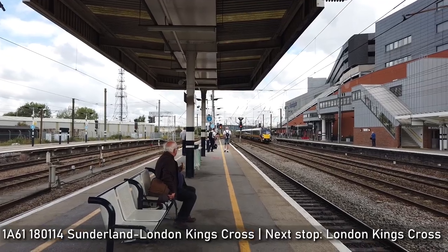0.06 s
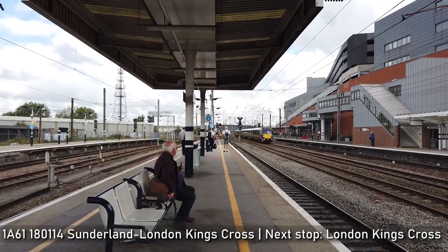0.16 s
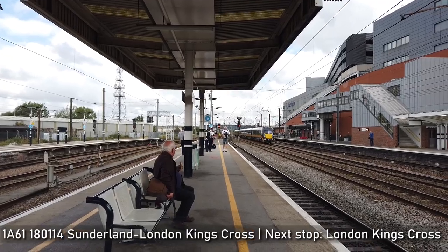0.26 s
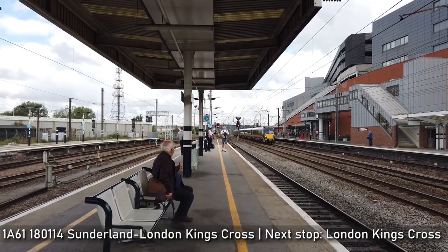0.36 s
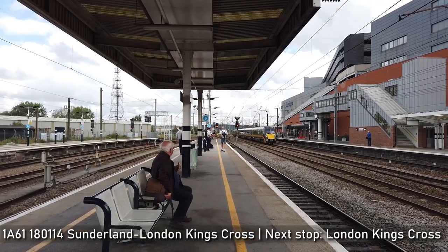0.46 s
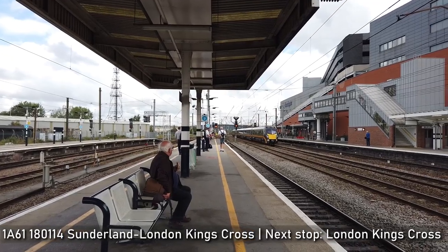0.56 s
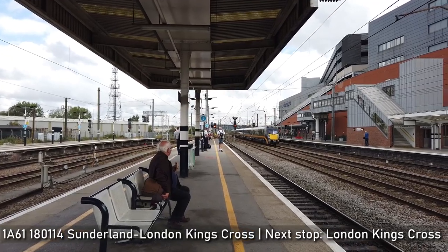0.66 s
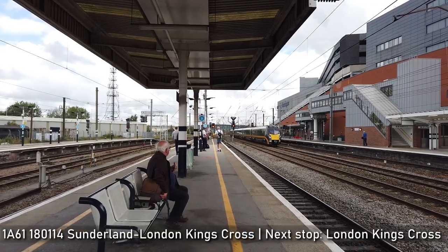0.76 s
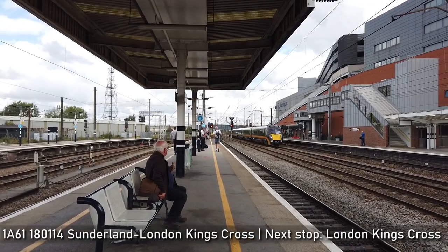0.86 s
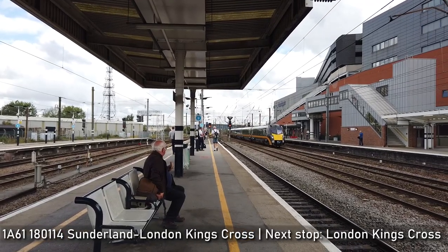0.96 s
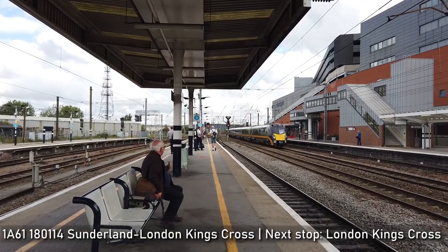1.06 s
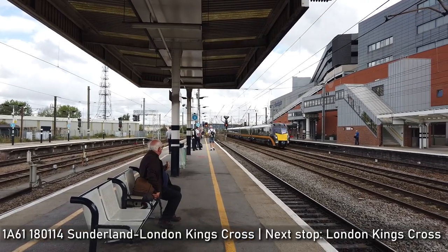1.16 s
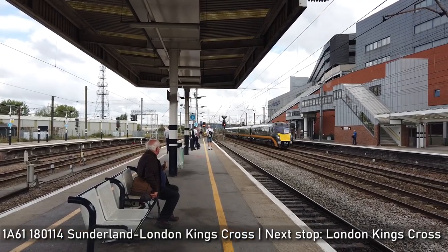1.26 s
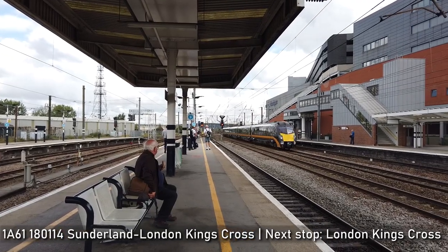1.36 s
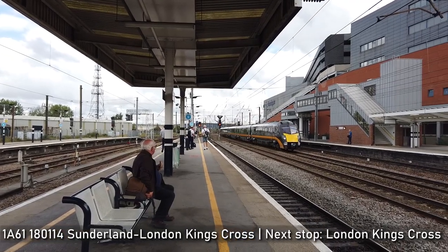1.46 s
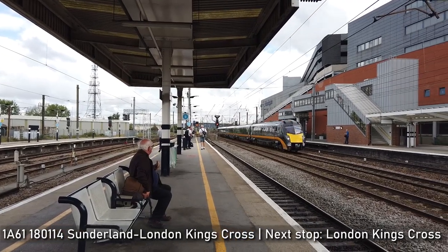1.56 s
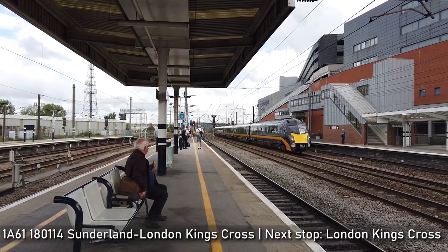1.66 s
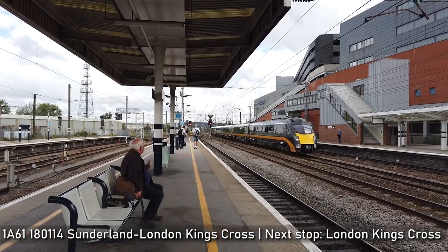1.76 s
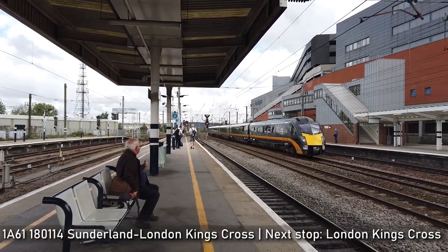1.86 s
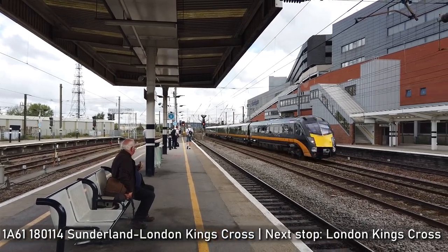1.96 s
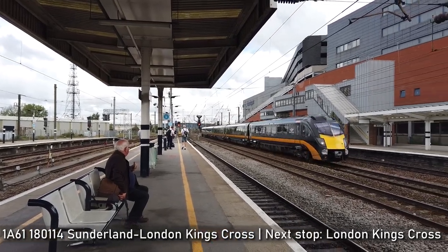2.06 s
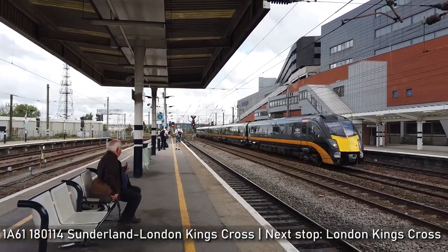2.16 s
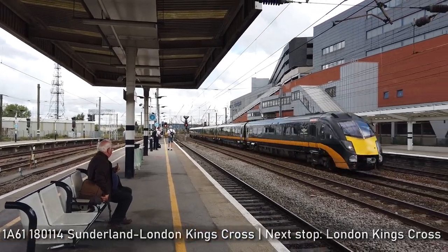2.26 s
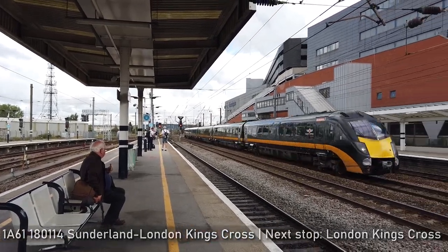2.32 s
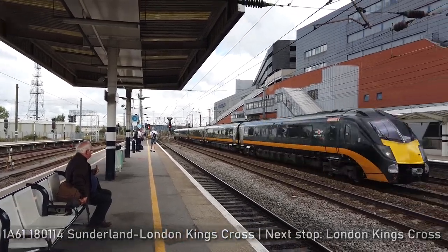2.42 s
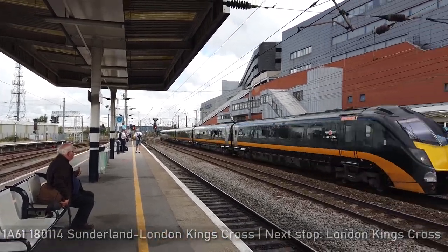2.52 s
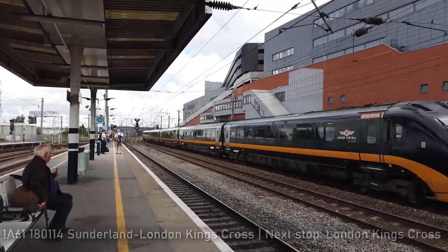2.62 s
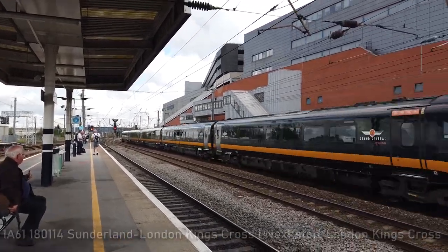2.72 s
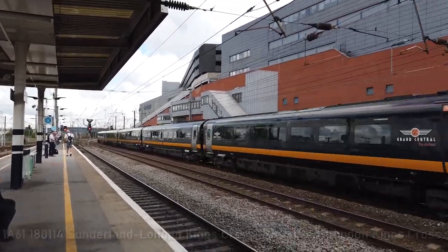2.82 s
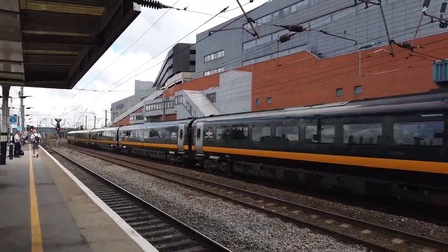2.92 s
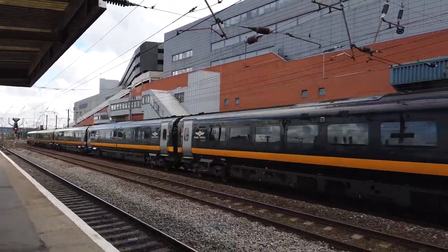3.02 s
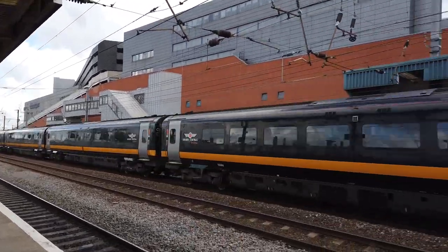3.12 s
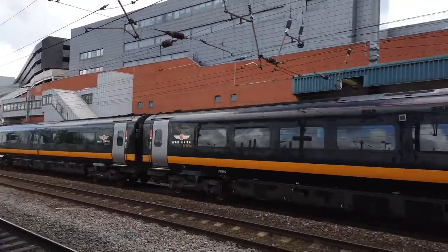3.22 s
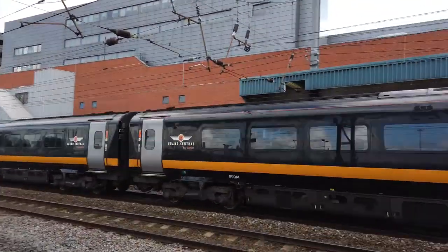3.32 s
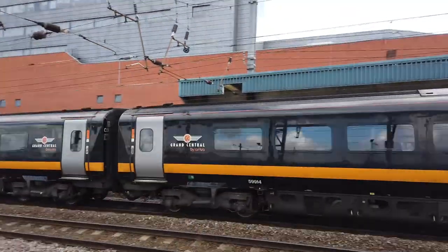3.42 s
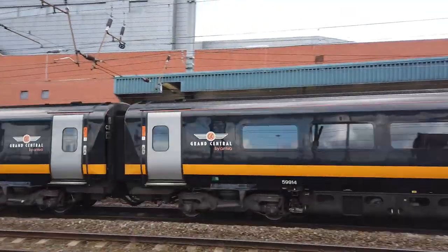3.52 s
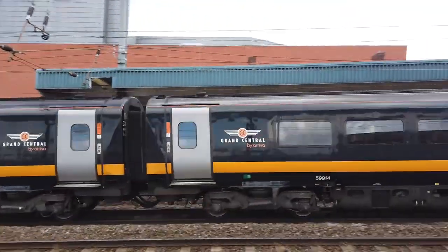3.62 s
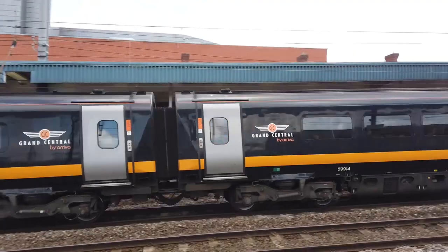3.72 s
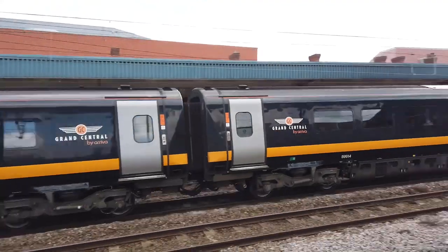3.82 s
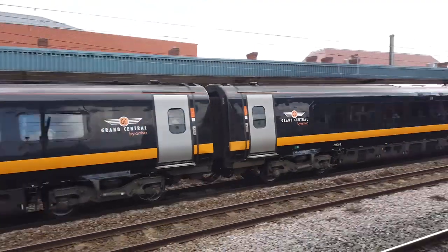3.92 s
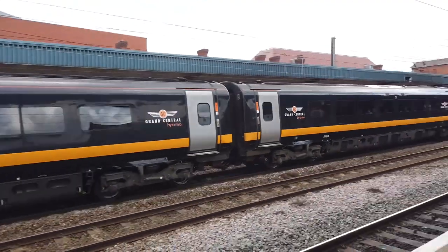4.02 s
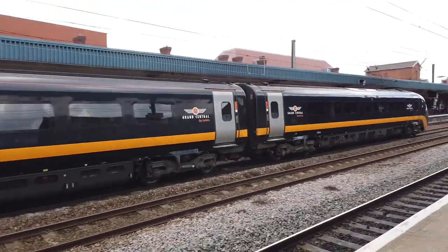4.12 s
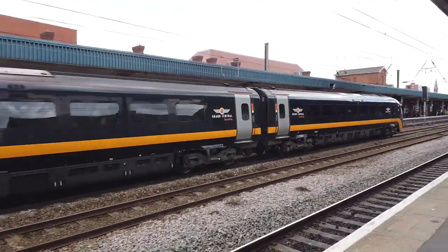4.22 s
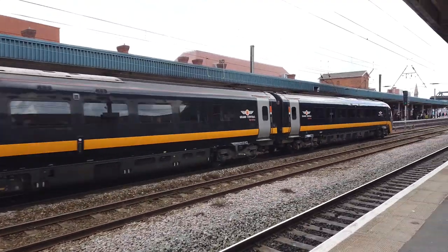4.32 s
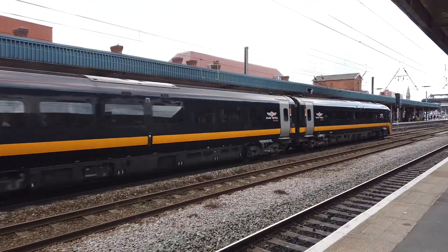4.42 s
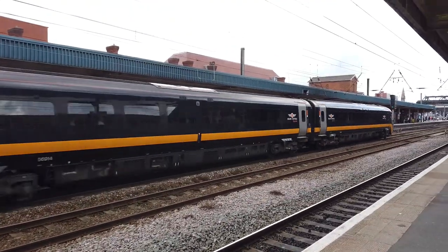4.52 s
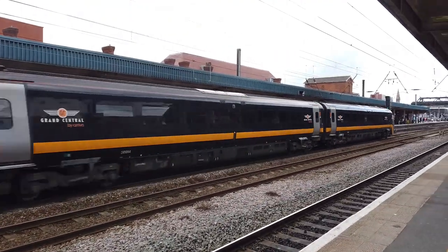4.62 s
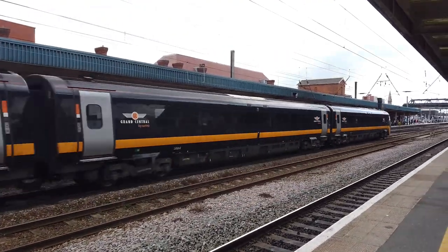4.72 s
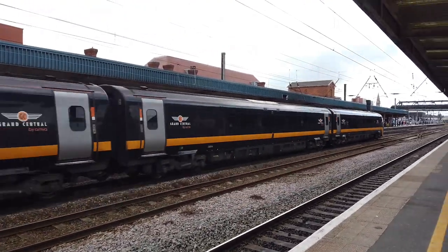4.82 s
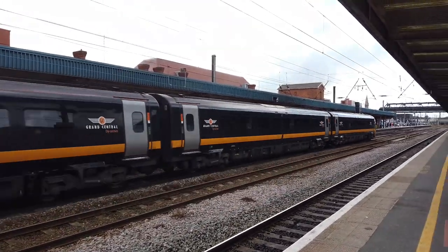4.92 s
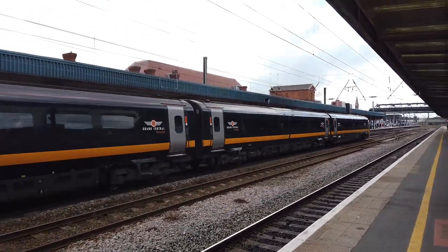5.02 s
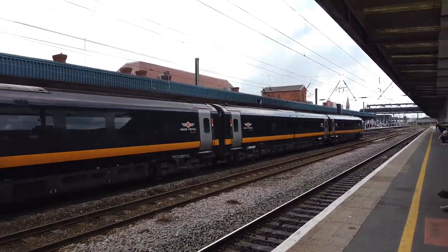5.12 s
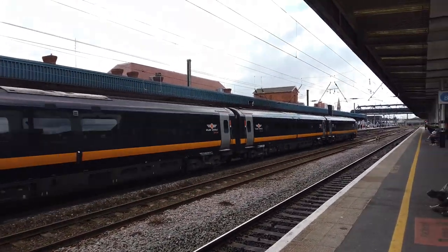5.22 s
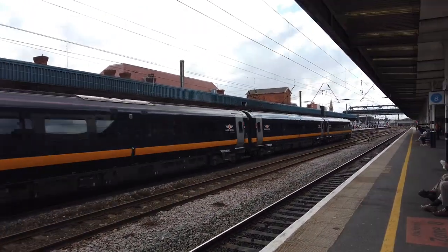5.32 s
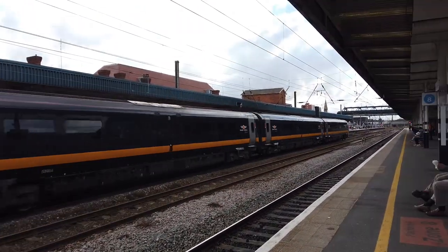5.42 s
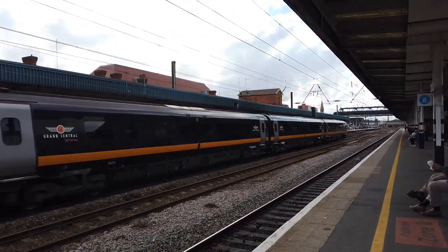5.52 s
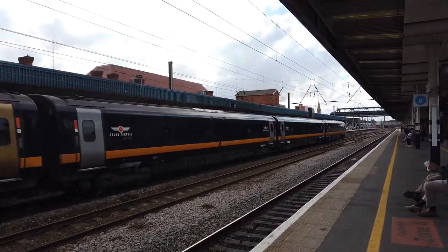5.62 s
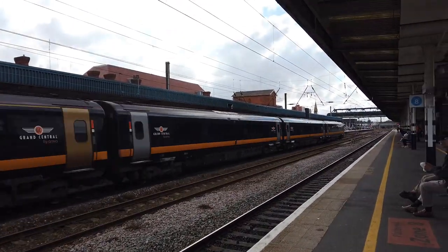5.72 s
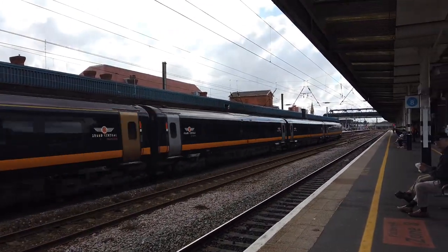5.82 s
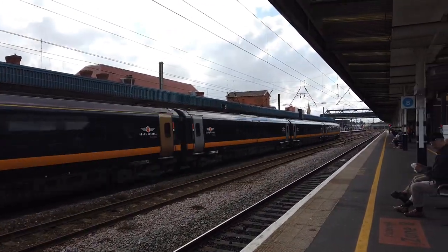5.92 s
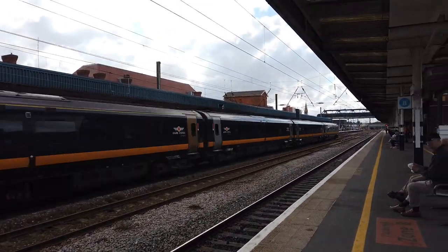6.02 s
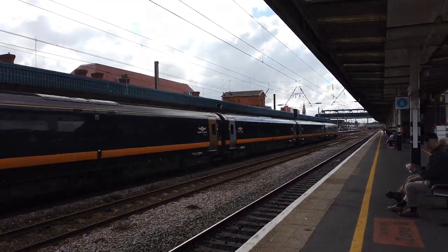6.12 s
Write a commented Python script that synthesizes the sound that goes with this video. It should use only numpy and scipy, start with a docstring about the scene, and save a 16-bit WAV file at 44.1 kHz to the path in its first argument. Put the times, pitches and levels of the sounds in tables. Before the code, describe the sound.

A handheld stereo microphone on a partly roofed platform catches a fast diesel train. It starts quietly with low hum, breeze and thin rail whistles; a hollow wind thump comes just after one second. Rumble and beating engine drone build quickly, then wheel roar, metallic whine and sizzling hiss pass close by, falling in pitch. Repeated scrapes and squeals keep the treble bright while the engine tone eases, the train still passing at the end.

```python
"""Diesel train passing a platform

A five-car diesel train runs through a station at about 94 km/h, two tracks from a microphone on the platform.
The rail sings and whistles at fixed pitches as the train nears and begins to pass. Beating engine harmonics,
whines and wheel rings fall in pitch by the Doppler effect; filtered noise from the bogies makes rumble, roar
and hiss, with rim squeals on top. Low-frequency noise buffets the microphone as wind, and decaying noise adds
the diffuse echo of the canopy."""
import sys
import numpy as np
from scipy import signal
from scipy.fft import rfft, irfft, next_fast_len
from scipy.io import wavfile
from scipy.ndimage import uniform_filter1d, map_coordinates

SR = 44100
rng = np.random.default_rng(int(sys.argv[2]) if len(sys.argv) > 2 else 0)


def int16_out(signal):
    """Quantize to a 16-bit WAV file."""
    q = np.round(np.clip(np.atleast_2d(signal).T, -1, 1) * 32767)
    wavfile.write(sys.argv[1], SR, q.astype(np.int16))


N = 272405
TIME = np.arange(N) / SR

# train speed, speed of sound; distance of wheels and of exhausts when abeam
SPEED_M_S, SOUND_M_S, TRACK_M, EXHAUST_M = 26., 343, 12., 16.5
# narrow bands hold a steady tone most strongly when much narrower than this
STEADY_UNDER_HZ = 30

# wind: level of the breeze and of the full wind, start and duration of the rise
BREEZE_DB, WIND_DB, WIND_RISES_S, WIND_RISE_S = -44.5, -34., .7, .55
# air pushed aside by the nose: peak_s, spread_s, gain_db
BOW_WAVE = (2.85, .55, 4)
# spectrum of the wind: frequency_hz, density_db (per Hz)
WIND_COLOUR = [(10, -30), (25, -5), (50, 3), (70, 1), (110, -5), (200, -36), (500, -59), (2000, -80)]
# single eddies that thump the microphone: peak_s, spread_s, level_db
EDDY_THUMPS = [(0.6, 0.013, -41), (1.077, 0.013, -32), (1.315, 0.043, -32)]
# spectrum of those thumps: frequency_hz, density_db (per Hz)
EDDY_COLOUR = [(30, -2), (130, 8), (220, 0), (320, -14), (600, -13), (2000, -62)]
# hollow thump: peak_s, spread_s, pitch_hz (at the peak), rise_hz_per_s, level_db
WHOOMP = (1.314, .018, 175, 2300, -28)

# rail singing and whistling as the train nears and begins to pass: peak_s, spread_s, pitch_hz, width_hz, level_db
RAIL_WHISTLES = [(.2, .45, 1700, 220, -53), (.35, .5, 5100, 400, -56), (1.27, .1, 5950, 400, -46),
                 (1.6, .3, 9560, 500, -56.5), (1.8, .5, 820, 200, -43), (1.95, .3, 1155, 40, -44.5),
                 (2.05, .35, 5850, 800, -45.5), (2.65, .24, 9700, 300, -52.5), (3.45, .5, 8680, 450, -48.5)]
# rail resonances: frequency_hz, width_hz, prominence_db (over the broad noise)
RAIL_MODES = [(760, 88, 14), (914, 170, 9), (1117, 164, 10.5), (1733, 460, 12.5), (3790, 820, 10.5)]

# low drone of fixed pitch: time_s, level_db
DRONE_LEVEL = [(0, -60), (2.1, -48), (2.45, -35), (2.8, -45), (4.1, -48), (4.5, -33), (4.72, -37),
               (4.9, -52), (5.2, -45), (5.45, -32.5), (6.18, -35)]
DRONE_HZ = 74.4

# tones and bands of engine half-orders, gears, fans and wheels:
# abeam_s, rest_pitch_hz, width_hz, level_db, loudest_s, spread_s
WHINES = [(3.9, 151, 4, -33, 3.48, .22), (3.9, 151, 4, -38, 4.3, .15), (5.72, 154, 8, -36, 5.65, .45),
          (3.55, 281, 7, -38.5, 2.3, .5), (3.55, 281, 12, -29.5, 3.32, .12),
          (3.55, 281, 12, -28.5, 3.73, .09), (4.82, 303, 14, -36, 4.7, .1), (3.4, 365, 14, -36, 2.4, .55),
          (3.92, 383, 20, -32.5, 3.1, .35), (3.92, 388, 12, -33, 3.95, .4), (3.6, 738, 30, -39, 3.0, .25),
          (3.5, 830, 90, -37, 3.45, .35), (4.25, 755, 25, -39.5, 4.25, .22),
          (3.75, 1175, 14, -36.5, 3.1, .22), (3.75, 1185, 14, -32.5, 3.68, .22),
          (3.75, 1190, 20, -37.5, 4.15, .1), (3.65, 1260, 170, -35.5, 3.55, .3),
          (3.7, 1980, 25, -41.5, 3.05, .22), (3.5, 1890, 25, -41.5, 2.92, .14),
          (3.6, 1960, 380, -30.3, 3.43, .27), (3.75, 1990, 140, -36, 3.98, .14),
          (3.5, 3800, 1000, -38, 3.3, .4), (3.65, 3950, 1000, -42, 3.95, .09),
          (3.75, 9080, 400, -44, 3.55, .28), (5.45, 1270, 350, -35.5, 5.3, .3),
          (3.6, 5350, 400, -38, 4.12, .2), (5.06, 5550, 450, -33, 4.5, .1),
          (5.87, 5380, 350, -31, 6.12, .15)]

# one engine to a car: abeam_s, relative_level_db
ENGINES = [(3.03, -17), (3.92, 0), (4.82, -1), (5.72, -6), (6.62, -13)]
# exhaust overtones: multiple (of the firing rate), relative_level_db
OVERTONES = [(1.5, -16.5), (2.5, -20.5), (3, -14.5), (3.5, -17), (4, -13)]
# firing rate at rest; octave flutter; higher overtones against the ROLLING_LEVEL rumble column
FIRING_HZ, OCTAVE_FLUTTER_DB, THROB_DB = 100.8, 1.8, -12
# slow level of the firing tone: time_s, level_db
HUM_LEVEL = [(0, -34.5), (.65, -32), (.9, -30), (1.5, -28.5), (2.1, -24), (2.85, -22), (3.7, -24.5),
             (4.15, -21.5), (4.85, -22), (5.15, -29.5), (5.5, -27), (6.18, -36.5)]
# brief swells and cancellations of the firing tone: peak_s, spread_s, change_db
HUM_FADES = [(1.075, .013, 6), (1.12, .014, -5), (1.225, .012, 4), (1.28, .012, 6), (1.318, .016, -8),
             (1.76, .062, -17), (1.91, .06, -4.5), (3.16, .07, -12), (3.54, .05, -13), (4.15, .028, 5),
             (4.33, .08, -6), (4.8, .025, 3), (4.99, .03, 4)]
# random flutter of the firing tone: time_s, spread_db
HUM_FLUTTER = [(.5, 0.4), (2.2, 2.2), (3.4, 2.2), (4, 1)]
# slow level of the octave above the firing tone: time_s, level_db
OCTAVE_LEVEL = [(0, -58), (1.3, -50), (1.55, -39.5), (1.85, -35.5), (2.1, -39), (2.5, -31.5), (2.85, -27),
                (3.2, -29.5), (3.7, -27.5), (3.95, -32), (4.5, -34.5), (4.75, -27), (5.1, -31.5),
                (6.18, -34.5)]

# bogies at car ends: abeam_s, relative_level_db, relative_squeal_db, relative_ring_db, pitch_ratio (ring, squeal)
BOGIES = [(2.9, -1, -10, -20, .98), (3.65, 2, -2, -17, .99), (4.35, -4, -11, -15, 1),
          (5.06, -2, -1, 0, 1.013), (5.87, -2, 0, -2, 1)]
# bogie frame resonances at rest: frequency_hz, width_hz, prominence_db (over the broad noise)
BOGIE_MODES = [(776.5, 43, 8.5), (1140, 140, 1.5), (1700, 840, 4)]
# levels of rumble and roar before fixed trims, with a wind thump in the rumble at 1.31 s:
# time_s, rumble_db, roar_db
ROLLING_LEVEL = [(0.05, -44.5, -45), (0.52, -44.3, -43.5), (1.26, -35, -36.5), (1.31, -27.5, -37.5),
                 (1.39, -36, -37.5), (2.42, -24.5, -30), (3.16, -24, -25.5), (3.68, -26.5, -26),
                 (4.3, -29, -30), (4.58, -29.5, -29.5), (4.69, -26.5, -28), (6.08, -28.5, -29.5)]
# spectrum of the underframe rumble: frequency_hz, density_db (per Hz)
RUMBLE_COLOUR = [(40, -32), (70, -8), (130, -2.5), (190, 2), (250, 0), (330, 0), (420, -0.5), (480, -5),
                 (600, -8), (750, -18), (1200, -49)]
# spectrum of the bogie and rail roar: frequency_hz, density_db (per Hz)
ROAR_COLOUR = [(350, -2), (620, -4), (900, 2), (1200, 2), (1480, -4.5), (1800, -1.5), (2200, 0.5),
               (2700, -0.5), (3150, -7), (3900, -12), (4400, -16), (6000, -12), (8000, -39)]
# spectrum of the wheel hiss: frequency_hz, density_db (per Hz)
HISS_COLOUR = [(3000, -68), (4400, -2.5), (5000, 10.5), (5600, 10), (6100, 4.5), (6800, -7), (7400, -61),
               (8100, -50), (8800, -24), (9700, -43), (11000, -24), (15000, -49)]
# spectrum of the sizzle above the hiss: frequency_hz, density_db (per Hz)
SIZZLE_COLOUR = [(6000, -8), (7500, -2.5), (8300, 2), (8800, 7.5), (9800, 4.5), (10400, 0.5), (11500, -4),
                 (13000, -9.5), (15000, -41)]
# the hiss rises steadily to its full level, then holds
HISS_DB, HISS_FULL_S, HISS_RISE_DB_PER_S = -33, 5.11, 4.5
# sizzle against the hiss, and its loss in the air between nose and platform
SIZZLE_DB, AIR_DB_PER_M = -4.2, 0.24

# rim squeals: pitch at rest and its spread; rate for each bogie and channel, length
SQUEAL_HZ, SQUEAL_SPREAD_HZ, SQUEALS_PER_S, SQUEAL_LENGTH_S = 5440, 370, 100, .12
# range of squeal sizes, and level of them all together against the hiss
SQUEAL_RANGE_DB, SQUEAL_DB = 9, -3
# high wheel mode at rest, before each bogie's pitch ratio; its level before distance and beaming
RING_HZ, RING_WIDTH_HZ, RING_DB = 9160, 340, -46.5
# beams of the high wheel mode: aim_degrees (ahead of abeam), spread_degrees, gain_db
WHEEL_BEAMS = [(52, 10, 11), (-14, 21, 8.5)]
# wheel rims scraping the rail: peak_s, spread_s, level_db, abeam_s, spray_db
SCRAPES = [(3.508, 0.2, -30, 3.47, -53), (4.788, 0.11, -26, 5.5, -40), (5.613, 0.12, -24.5, 5.87, -41.5)]
# spectrum of a scrape at rest: frequency_hz, density_db (per Hz)
SCRAPE_COLOUR = [(3900, -45), (4750, -3), (5500, 10.5), (5900, 7), (6600, -24), (7700, -17), (10000, -9.5),
                 (15000, -43)]
# spectrum of the spray after a scrape: frequency_hz, density_db (per Hz)
SPRAY_COLOUR = [(7000, -32), (10500, 5), (12500, 1), (15000, -16)]
SPRAY_LAG_S, SPRAY_SPREAD_S = 0.15, 0.09

# echo: decay time to -60 dB, level against the direct sound
CANOPY_T60_S, CANOPY_DB = 1, -10.5
# swelling and fading of narrow treble bands: frequency_hz, spread_db
GLINT = [(600, 0), (1200, 1.2), (2200, 1.9), (3800, 2), (5200, 3), (9500, 2.6), (12000, 2)]
# difference of the two microphone ports: frequency_hz, level_db (against their sum)
PORT_SIDE = [(30, -9.5), (110, -7.8), (220, -6.2), (330, -4.2), (700, -3.6), (1100, -.8), (2300, -3.5),
             (3150, 1.8), (4100, -3.5), (5500, 1.1), (8000, -2.5), (9300, 0.1), (15000, -2)]
# part of that difference that follows the sum: frequency_hz, share (0-1)
PORT_SHARE = [(30, .65), (90, 0.98), (500, 1), (1000, 0.95), (1500, 0.61), (2750, .6), (3300, 0.24)]
TOP_HZ = 15400  # upper limit of the microphone


def undb(db):
    """Logarithmic level: decibels to amplitude gain."""
    return 10 ** (np.asarray(db) / 20)


def curve(table, axis=1):
    """Linear interpolation of one table column over time."""
    rows = np.array(table)
    return np.interp(TIME, rows[:, 0], rows[:, axis])


def bump(peak_s, spread_s):
    """Gaussian envelope: a smooth rise and fall, 1 at the peak."""
    return np.exp(-.5 * ((TIME - peak_s) / spread_s) ** 2)


def walk(rate):
    """Band-limited chance: about `rate` turns a second, with a spread of 1."""
    knots = rng.standard_normal(8192)
    smooth = signal.resample(knots, 4 * 8192)
    return np.interp(TIME * rate, np.arange(0, 8192, 1 / 4), smooth)


def over_pitch(points, f):
    """Interpolation of (Hz, value) points on a log-frequency axis."""
    hz, value = np.transpose(points)
    return np.interp(np.log(f + 1), np.log(hz), value)


def shape(x, response):
    """Linear filtering: multiply the spectrum by a function of frequency."""
    size = next_fast_len(x.shape[-1] + 4096, True)
    f = np.arange(size // 2 + 1) * SR / size
    return irfft(rfft(x, size) * response(f), size)[..., :x.shape[-1]]


def colour(x, points):
    """Spectral colouring by a curve in dB."""
    return shape(x, lambda f: undb(over_pitch(points, f)))


def stereo_noise():
    """White noise, unrelated in two channels."""
    return rng.standard_normal((2, N))


def ringing(modes, size):
    """Resonance: two unrelated broad noises with modes standing out of them."""
    def response(f):
        power = 1
        for hz, width, db in modes:
            power = power + undb(db) ** 2 / (1 + (2 * (f - hz) / width) ** 2) ** 2
        return np.sqrt(power)
    return shape(rng.standard_normal((2, size)), response)


def swell(x, db, size=13000):
    """Power normalisation: impose the slow level db while the quick flutter stays."""
    power = uniform_filter1d(np.mean(np.atleast_2d(x) ** 2, axis=0), size // 2)
    return x * undb(db) / np.sqrt(uniform_filter1d(power, size // 2) + 1e-18)


def narrow_band(hz, width, clock):
    """Random modulation of a carrier following a clock: the narrower the band, the steadier its tone."""
    phase, steady = 2 * np.pi * hz * clock, STEADY_UNDER_HZ / width
    sine, cosine = np.sin(phase), np.cos(phase)
    bands = np.array([(steady + walk(width)) * sine + walk(width) * cosine for _ in range(2)])
    return bands / np.sqrt(1 + steady ** 2 / 2)


def passing(abeam_s, across_m=TRACK_M):
    """Retarded time of a moving source: emission clock, nearness (1 abeam), bearing (1 coming, -1 going)."""
    c, v = SOUND_M_S, SPEED_M_S
    heard = TIME - abeam_s + across_m / c
    squeeze = c ** 2 - v ** 2
    sent = (c ** 2 * heard - np.sqrt((c * v * heard) ** 2 + across_m ** 2 * squeeze)) / squeeze
    distance = np.hypot(v * sent, across_m)
    # the clock starts at zero
    return sent - sent[0], across_m / distance, -v * sent / distance


def replay(source, place):
    """Doppler shift of noise: read both channels at moving sample positions."""
    return np.array([map_coordinates(x, [place], order=3, mode="wrap") for x in source])


def wind(buffet_db=1.2):
    """Turbulent pressure: eddies buffet the microphone and a few hit it hard enough to thump."""
    peak_s, spread_s, bow_db = BOW_WAVE
    wind_db = np.interp(TIME, [WIND_RISES_S, WIND_RISES_S + WIND_RISE_S], [BREEZE_DB, WIND_DB])
    wind_db = wind_db + bow_db * bump(peak_s, spread_s)
    gusts = swell(colour(stereo_noise(), WIND_COLOUR), wind_db) * undb(buffet_db * walk(9.6))
    blows = sum(undb(db) * bump(s, spread) for s, spread, db in EDDY_THUMPS)
    return gusts + blows * swell(colour(stereo_noise(), EDDY_COLOUR), 0)


def whoomp():
    """Linear chirp under a Gaussian envelope: a low, hollow thump bending quickly upward."""
    peak_s, spread_s, hz, rise, db = WHOOMP
    t = TIME - peak_s
    cycles = hz * t + rise * t ** 2 / 2 + rng.random()
    return undb(db) * np.sqrt(2) * bump(peak_s, spread_s) * np.sin(2 * np.pi * cycles)


def rail_whistle():
    """Structure-borne sound: bands at fixed pitches, the rail singing as the train nears and begins to pass."""
    out = 0
    for peak_s, spread_s, hz, width, db in RAIL_WHISTLES:
        out = out + undb(db) * bump(peak_s, spread_s) * narrow_band(hz, width, TIME)
    return out


def drone():
    """Sinusoid with slight phase wander: a low drone that comes and goes."""
    tone = np.sin(2 * np.pi * DRONE_HZ * TIME + 0.21 * walk(6))
    return undb(curve(DRONE_LEVEL)) * np.sqrt(2) * tone


def whines():
    """Doppler glide: engine half-orders, gears, fans and wheels, often overlapping, fall in pitch as they pass."""
    out = 0
    for abeam_s, hz, width, db, loudest_s, spread_s in WHINES:
        clock = passing(abeam_s)[0]
        out = out + undb(db) * bump(loudest_s, spread_s) * narrow_band(hz, width, clock)
    return out


def beams(abeam_s):
    """Directivity: gain of a wheel's high mode as its beams sweep across the platform."""
    degrees = np.degrees(np.arcsin(passing(abeam_s)[2]))
    gain_db = 0
    for aim, spread, db in WHEEL_BEAMS:
        gain_db = gain_db + db * np.exp(-.5 * ((degrees - aim) / spread) ** 2)
    return undb(gain_db)


def wheel_rings(loss_db_per_m=0.33):
    """Modal radiation with loss by distance: each bogie's wheels ring in a high mode that slides down in passing."""
    out = 0
    for abeam_s, _, _, ring_db, pitch in BOGIES:
        sent, near, _ = passing(abeam_s)
        # the loss is counted from twice the abeam distance
        beyond_m = TRACK_M * (1 / near - 2)
        gain = near * undb(RING_DB + ring_db - loss_db_per_m * beyond_m)
        out = out + gain * beams(abeam_s) * narrow_band(RING_HZ * pitch, RING_WIDTH_HZ, sent)
    return out


def scrapes():
    """Friction noise: hiss surges from single wheels, Doppler-shifted, each trailed by a bright spray."""
    source = swell(colour(stereo_noise(), SCRAPE_COLOUR), 0)
    out, spray = 0, 0
    for peak_s, spread_s, db, abeam_s, spray_db in SCRAPES:
        out = out + undb(db) * bump(peak_s, spread_s) * replay(source, passing(abeam_s)[0] * SR)
        spray = spray + undb(spray_db) * bump(peak_s + SPRAY_LAG_S, SPRAY_SPREAD_S)
    return out + spray * swell(colour(stereo_noise(), SPRAY_COLOUR), 0)


def squeals():
    """Stick-slip: the rims catch and let go in many brief, clean squeals that slide down with their bogie."""
    out = np.zeros((2, N))
    half = int(SQUEAL_LENGTH_S * SR / 2)
    count = int(SQUEALS_PER_S * N / SR)
    for abeam_s, _, squeal_db, _, pitch in BOGIES:
        sent, near, _ = passing(abeam_s)
        for channel in out:
            for place, turn, detune, size in rng.random((count, 4)):
                centre = int(place * N)
                span = np.arange(max(centre - half, 0), min(centre + half, N))
                hz = pitch * (SQUEAL_HZ + SQUEAL_SPREAD_HZ * (2 * detune - 1))
                gain = undb(squeal_db - SQUEAL_RANGE_DB * size) * near[centre] ** 2
                window = np.cos(np.pi / 2 * (span - centre) / half) ** 2
                channel[span] += gain * window * np.sin(2 * np.pi * (hz * sent[span] + turn))
    return out


def engines(rumble_db, waver=.25):
    """Interference: five exhausts, each with its own Doppler glide, beat against each other."""
    firing, octave, overtones = 0, 0, 0
    for abeam_s, db in ENGINES:
        sent, near, _ = passing(abeam_s, EXHAUST_M)
        phase, gain = 2 * np.pi * (FIRING_HZ * sent + rng.random()), undb(db) * near
        firing = firing + gain * np.sin(phase)
        octave = octave + gain * np.sin(2 * phase + waver * walk(8))
        for multiple, line_db in OVERTONES:
            # a four-stroke sounds on half multiples; shifting reflections make each waver
            angle = np.round(2 * multiple) / 2 * phase + 2 * np.pi * rng.random()
            line_gain = undb(line_db) * gain * (1 + waver * walk(12))
            overtones = overtones + line_gain * np.sin(angle + waver * walk(12))
    fades_db = sum(db * bump(s, spread) for s, spread, db in HUM_FADES)
    hum_db = curve(HUM_LEVEL) + fades_db + curve(HUM_FLUTTER) * walk(14)
    hum = swell(firing, hum_db, size=7500)
    octave = swell(octave, curve(OCTAVE_LEVEL) + OCTAVE_FLUTTER_DB * walk(14), size=5000)
    return hum + octave + swell(overtones, rumble_db + THROB_DB)


def bogies():
    """Roughness excitation: wheel and rail shake each bogie; its noise is Doppler-shifted and swells as it nears."""
    source, out = ringing(BOGIE_MODES, size=2 * N), 0
    for k, (abeam_s, db, *_) in enumerate(BOGIES):
        sent, near, _ = passing(abeam_s)
        # each bogie starts at another point of the noise
        out = out + undb(db) * near * replay(source, sent * SR + k * N // 8)
    return out


def ground_bounce(x, lag_s=0.001273, strength=0.13):
    """Comb filtering: an inverted reflection off the ballast, while the train approaches at a shallow angle."""
    echo = shape(x, lambda f: np.exp(-2j * np.pi * f * lag_s) * np.clip(f / 1200, 0, 1) ** 2)
    return x - strength * np.interp(TIME, [3.6, 4.4], [1, 0]) * echo


def rolling(rumble_db, rail_db=-6, lump_db=1.2, flutter_db=0.5, hiss_flutter_db=1.27):
    """Wheel-rail excitation: underframe rumble, bogie and rail roar, hiss, sizzle and squeal of the rims."""
    wheels = bogies()
    # the rails carry the vibration far ahead, so they lead while the train is distant
    rail_fade = undb(np.interp(TIME, [2.6, 4.6], [0, -9]))
    rails = undb(rail_db) * ringing(RAIL_MODES, size=N) * rail_fade
    rumble = swell(colour(wheels, RUMBLE_COLOUR), rumble_db - 3.5 + lump_db * walk(14))
    roar_db = curve(ROLLING_LEVEL, axis=2) - .9 + flutter_db * walk(20)
    roar = swell(colour(ground_bounce(wheels + rails), ROAR_COLOUR), roar_db)
    hiss_db = HISS_DB - HISS_RISE_DB_PER_S * np.maximum(HISS_FULL_S - TIME, 0)
    hiss = swell(colour(wheels, HISS_COLOUR), hiss_db + hiss_flutter_db * walk(20))
    nose_m = SPEED_M_S * np.maximum(BOGIES[0][0] - TIME, 0)
    sizzle_db = hiss_db + SIZZLE_DB - AIR_DB_PER_M * nose_m + hiss_flutter_db * walk(25)
    sizzle = swell(colour(wheels, SIZZLE_COLOUR), sizzle_db)
    return rumble + roar + hiss + sizzle + swell(squeals(), hiss_db + SQUEAL_DB)


def canopy(x):
    """Reverberation: a diffuse, exponentially decaying echo from the platform roof and the buildings."""
    t = TIME[:SR]
    tail = rng.standard_normal((2, SR)) * np.exp(-np.log(1000) * t / CANOPY_T60_S) * (t > .015)
    tail /= np.sqrt(np.sum(tail ** 2, axis=1, keepdims=True))
    echo = signal.fftconvolve(x, tail, axes=1)[:, :N]
    return (x + undb(CANOPY_DB) * echo) / np.hypot(1, undb(CANOPY_DB))


def glint(x, size=1024):
    """Multipath fading: shifting reflections make narrow treble bands swell and fade, each on its own."""
    f, _, bands = signal.stft(x, SR, nperseg=size)
    chance = uniform_filter1d(rng.standard_normal(bands.shape), size=2, axis=1)
    chance = uniform_filter1d(chance, size=6, axis=2)
    gain = undb(over_pitch(GLINT, f)[:, None] * chance / chance.std())
    gain /= np.sqrt(np.mean(gain ** 2, axis=2, keepdims=True))
    return signal.istft(bands * gain, SR, nperseg=size)[1][:, :N]


def ports(mid, diffuse, scatter=1.0, scatter_hz=2500):
    """Phase difference of two close ports: it leads their sum a quarter cycle in the bass, diffuse in the treble."""
    def share(f):
        return np.clip(over_pitch(PORT_SHARE, f), 0, 1)

    def treble(f):
        return scatter * f ** 4 / (f ** 4 + scatter_hz ** 4)
    # the treble scatters within a few milliseconds, in a slowly drifting mix of two patterns
    echoes = rng.standard_normal((2, 221))
    echoes = echoes - echoes[:, ::-1]  # odd in time: the ports differ in phase, not in level
    bright, turn = shape(mid, treble), 2 * walk(2)
    first, second = (signal.fftconvolve(bright, e / np.linalg.norm(e), mode="same") for e in echoes)
    scattered = np.cos(turn) * first + np.sin(turn) * second
    unrelated = shape(diffuse + scattered, lambda f: np.sqrt((1 - share(f) ** 2) / (1 + treble(f) ** 2)))
    leading = shape(mid, lambda f: 1j * share(f))
    side = colour(leading + unrelated, PORT_SIDE)
    return np.array([mid + side, mid - side])


def scene():
    """Superposition: train and wind add up at the two ports."""
    rumble_db = curve(ROLLING_LEVEL)
    echoing = rail_whistle() + whines() + wheel_rings() + scrapes() + rolling(rumble_db)
    mid, diffuse = glint(canopy(echoing)) + wind()
    return ports(mid + whoomp() + drone() + engines(rumble_db), diffuse)


def record(dry):
    """Band limiting: a steep elliptic low-pass cuts the top."""
    return signal.sosfilt(signal.ellip(10, .2, 80, TOP_HZ, fs=SR, output="sos"), dry)


dry = scene()
out = record(dry)
int16_out(out)
```